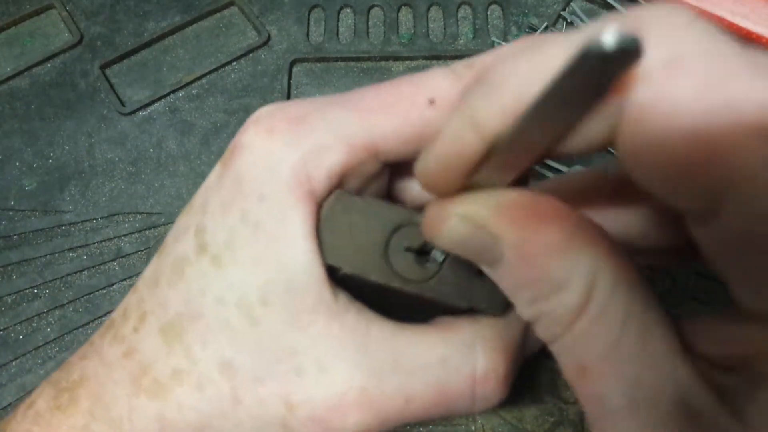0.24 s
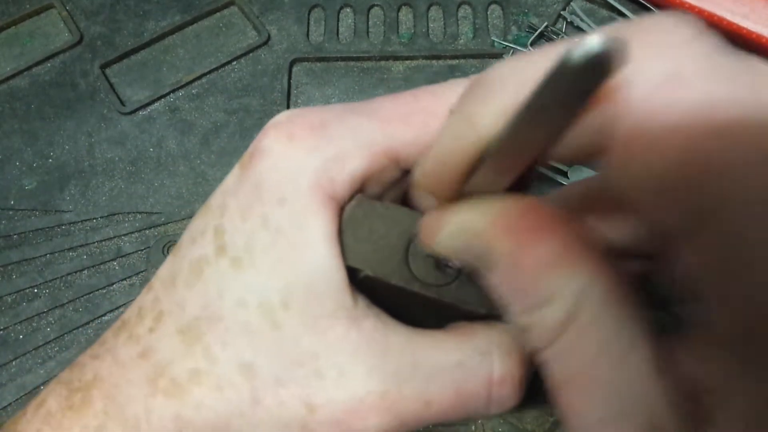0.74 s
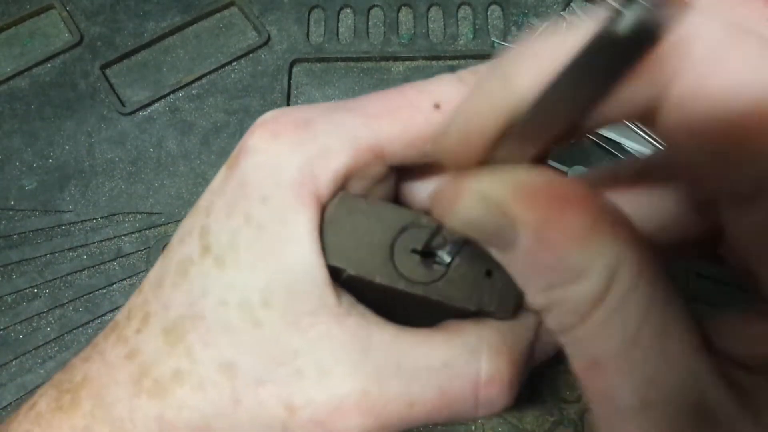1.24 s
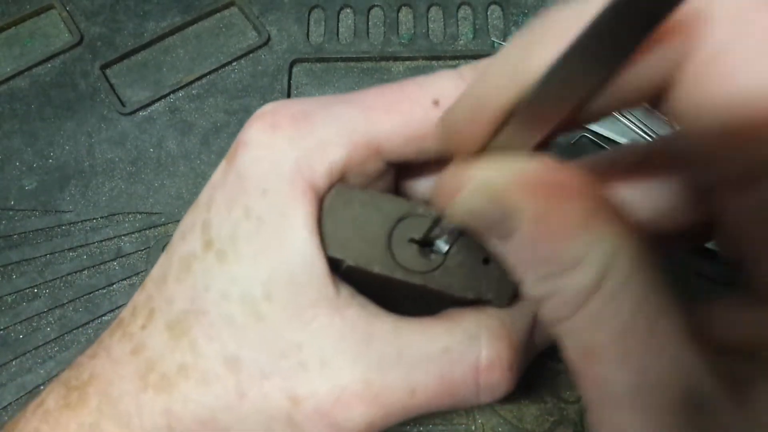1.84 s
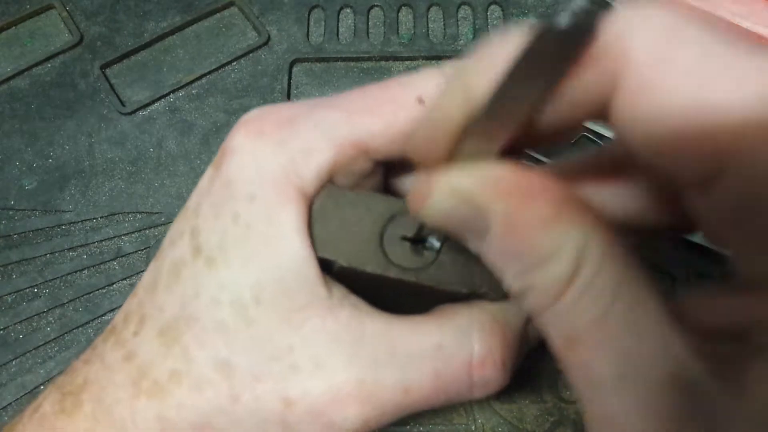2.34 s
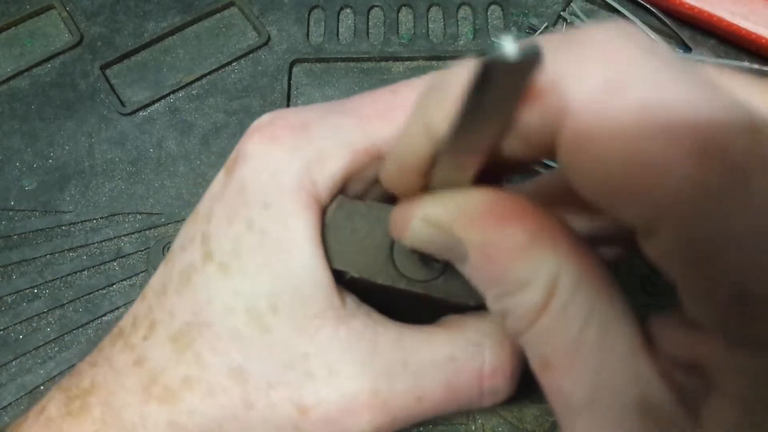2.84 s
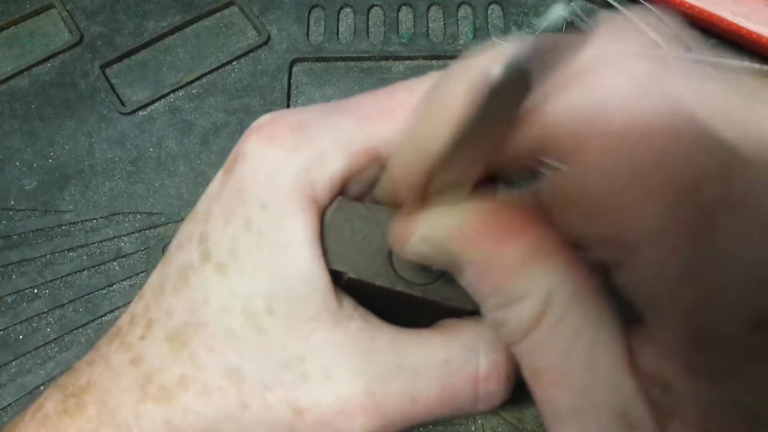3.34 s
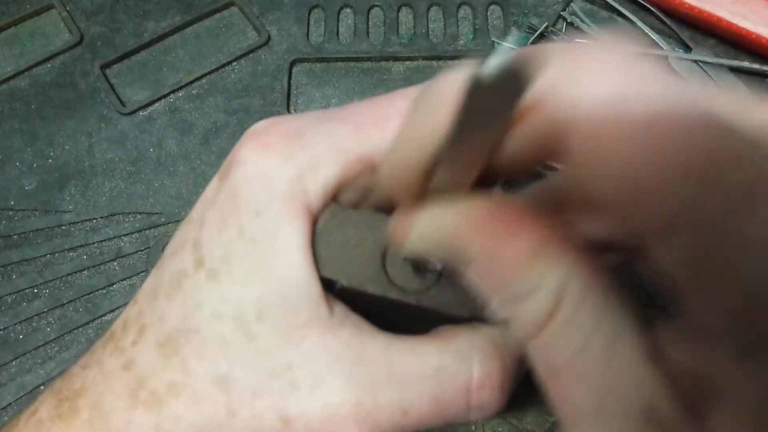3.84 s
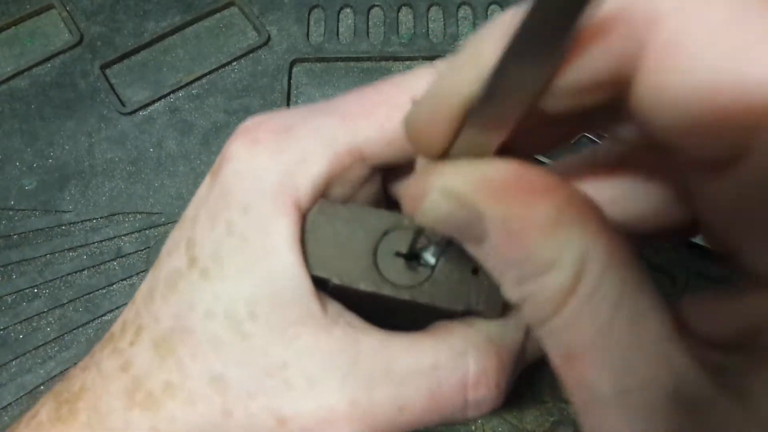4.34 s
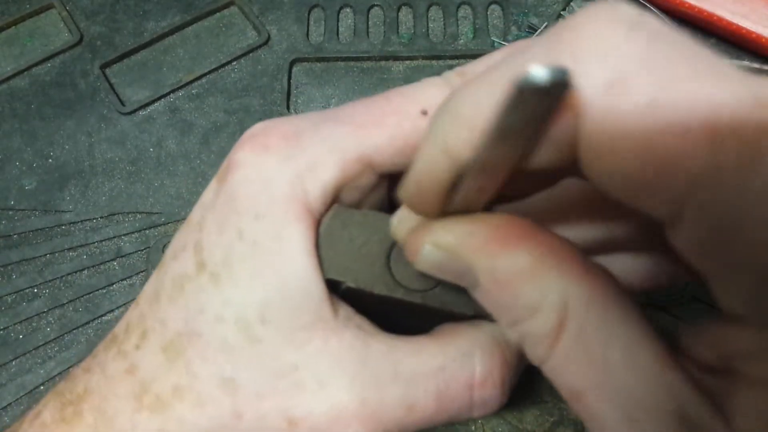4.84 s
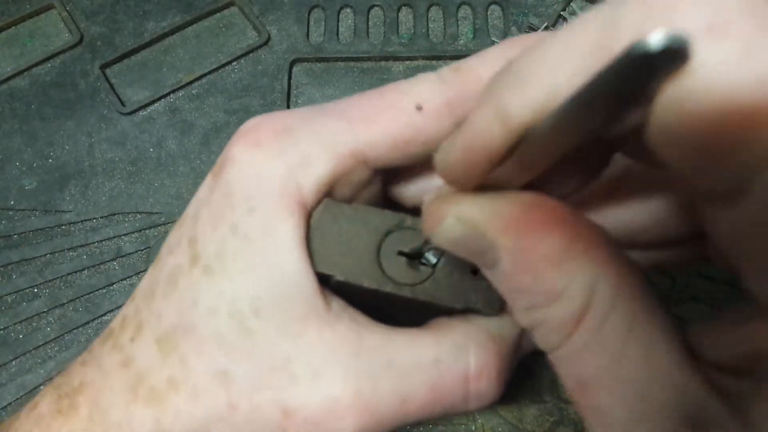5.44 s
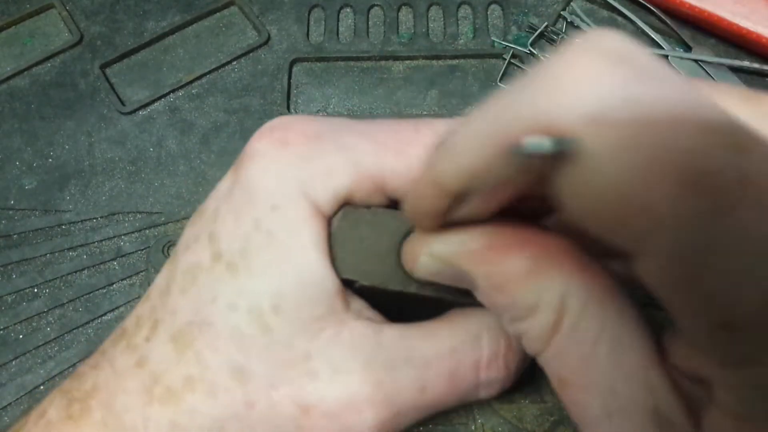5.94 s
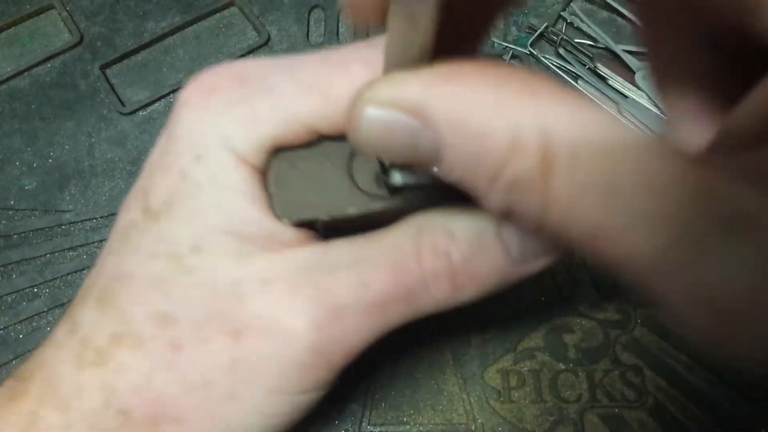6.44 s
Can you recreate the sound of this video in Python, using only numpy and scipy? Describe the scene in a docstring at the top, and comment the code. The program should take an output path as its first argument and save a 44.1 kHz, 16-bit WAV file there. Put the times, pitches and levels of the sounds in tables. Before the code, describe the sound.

Irregular light metal ticks come in twos and threes as a pick is pushed into and pulled out of a lock, crisp and high, with small hollow knocks, dull thumps of the hand and rubbing on a mat. They thin out slightly before a hard, bright snap with a short clunk and metallic ring near the end. Faint ticks follow. Close stereo microphone, brighter on the right, small room with low steady hush.

```python
"""A padlock held over a rubber mat in a small room, close to and right of a stereo microphone; room tone throughout.
From the start the pick is pushed in and pulled back in quick bursts: steel contacts are shaped bursts of filtered
grit. Bumps of the hand ring the bench modes softly, while skin and mat rustle as swelling filtered noise.
At about 6.1 s the shackle springs free: hard blows excite two ringing groups of modes, the body clunks and
the bench is jolted. A few small pin snaps and a last faint pull follow, over the dying reverberation."""
import sys
import numpy as np
from scipy import signal
from scipy.fft import rfft, irfft
from scipy.io import wavfile
from scipy.ndimage import uniform_filter1d

SR = 44100
rng = np.random.default_rng(int(sys.argv[2]) if len(sys.argv) > 2 else 0)


def master_out(mix):
    """Clip the mix to full scale and print it as 16-bit PCM to the path in sys.argv[1]."""
    frames = np.transpose(np.atleast_2d(mix))
    ceiling = np.clip(frames, -1, 1)
    pcm = np.round(ceiling * 32767).astype(np.int16)
    wavfile.write(sys.argv[1], SR, pcm)


N = 294588
TIME = np.arange(N) / SR

# Table levels are taken ahead of the layer gains and the room. Spectra give shape only; coloured() keeps the power.
# Contact length is the rise plus the fall time constant of the contact's power.

# Room tone spectrum: (frequency [Hz], relative density [dB])
ROOM_TONE_SPECTRUM = [(12, -14), (20, -38), (38, 2.5), (107, -0.5), (241, -7), (293, -5.5), (590, -16.5),
                      (825, -17), (1400, -18.5), (1960, -20), (3630, -18.5), (6720, -10), (9400, -22.5),
                      (14700, -21.5), (16000, -20)]
# Room reverberation: (frequency [Hz], level re direct [dB], t60 [s])
ROOM_DECAY = [(148, -4, 0.66), (400, -8, 0.38), (980, -9.5, 0.32), (2120, -9.5, 0.27), (3560, -7, 0.27),
              (4900, -7, 0.34), (6900, -9.5, 0.33), (10400, -8, 0.21), (15100, -19, 0.42)]
# Left microphone, shaded from the lock: (frequency [Hz], left re right [dB])
LEFT_SHADE = [(100, -1.5), (500, -3.5), (2000, -4.5), (4500, -4.5), (7000, -5.5), (9000, -9.5),
              (12000, -13), (16000, -17.5)]
# Fingers shifting on the lock, points of a level curve: (time [s], level [dB])
GRIP_LEVELS = [(0, -62.5), (0.8, -59.5), (1.3, -58), (2.0, -52.5), (2.7, -60.5), (3.6, -59), (4.2, -56),
               (4.6, -75), (5.1, -61), (5.6, -58.5), (6.68, -78)]
# Skin on the lock: (frequency [Hz], relative density [dB])
SKIN_SPECTRUM = [(30, -11.5), (80, 4.5), (170, -1.5), (330, -5.5), (600, -14.5), (1200, -17.5), (4000, -41)]
# Hands sliding on the mat: (time of peak [s], level [dB], half length [s])
MAT_RUBS = [(0.174, -47, 0.076), (0.992, -49.5, 0.051), (1.524, -47.5, 0.085), (1.984, -51.5, 0.11),
            (2.112, -50, 0.056), (2.37, -56, 0.099), (2.597, -55, .059), (3.511, -49.5, 0.076),
            (3.834, -46.5, 0.056), (4.27, -48.5, 0.072), (4.7, -55.5, 0.11), (5.707, -48, 0.068)]
# Hands on the mat: (frequency [Hz], relative density [dB])
RUB_SPECTRUM = [(50, -7), (120, -12.5), (250, -2), (370, -5), (520, -13), (750, -11.5), (1200, -23),
                (4000, -38)]
# Modes of the bench: (frequency [Hz], relative level [dB], t60 [s])
BENCH_MODES = [(99.4, 4, 0.13), (152.9, -2, 0.33), (168.8, 0.5, 0.15), (207, 2, 0.18), (233, -14.5, 0.75),
               (293, -2.5, 0.26), (316, 3.5, 0.069), (356, 4.5, 0.15), (390, -13, 0.28), (445, -5, 0.23),
               (520, -15, 0.11), (623, -8, 0.07)]
# Jolts of the bench as the lock opens: (time [s], level [dB])
OPENING_JOLTS = [(6.1590, -29.5), (6.1795, -35)]
# Lock body clunking in the hand, one row: (time [s], level [dB], frequency [Hz], t60 [s])
BODY_CLUNK = (6.1583, -9, 320, .012)
# Shackle and latch blows at the opening: (time [s], level [dB], contact length [ms])
SHACKLE_BLOWS = [(6.1432, -23, 3), (6.1571, -11, 5.3), (6.1650, -22.5, 2.3), (6.171, -21, 1.9),
                 (6.1768, -4, 1.67), (6.19, -25, 16)]
# Blows of the shackle: (frequency [Hz], relative density [dB])
SHACKLE_SPECTRUM = [(80, -65), (500, -13), (800, -15), (1400, -19), (2400, -15), (3600, -15.5),
                    (4700, -10.5), (5200, -6), (6000, -8), (6300, -8), (7000, -13.5), (9400, -16),
                    (10000, -4), (10200, -8), (10600, 6.5), (11200, -13), (12500, -15), (16000, -33)]
# Groups of shackle modes that ring on: (centre [Hz], spread [Hz], level [dB], t60 [s])
SHACKLE_MODE_GROUPS = [(5400, 550, -14.5, 0.26), (11060, 320.3, -23, 0.19)]
# Hollow knock of the lock body: (frequency [Hz], relative density [dB])
KNOCK_SPECTRUM = [(50, -35.5), (130, 3.5), (300, 0), (520, -6), (900, 0), (1350, -6.5), (2000, -0.5),
                  (2600, -3.5), (3300, -1.5), (4200, -2), (5500, -20.5)]
# Ring of the steel pick: (frequency [Hz], relative density [dB])
RING_SPECTRUM = [(2800, -19.5), (4000, -6), (5000, -6), (6000, -0.5), (6750, 3), (7400, -1), (8400, -1.5),
                 (10500, -38)]
# Bright scraping edge: (frequency [Hz], relative density [dB])
EDGE_SPECTRUM = [(6500, -15.5), (8800, 0.5), (11000, 1.5), (13000, 2.5), (15200, 3), (17000, -36)]
# Pick pushed in over the pins to the back of the keyway:
# (time [s], stroke length [ms], level [dB], knock at the stop [dB], hand bump [dB])
PUSHES = [(0.0431, 27.3, -24, -25.5, -47), (0.4203, 5.8, -29.5, -25, -58), (0.673, 8.9, -28.5, -32.5, -52),
          (1.1633, 8.55, -28.5, -24, -60), (1.403, 31.4, -22, -24, -41), (1.6917, 46.5, -23.5, -25.5, -51),
          (1.9509, 27.7, -20.5, -24, -45.5), (2.24, 48, -22.5, -23, -63), (2.5338, 21.3, -22.5, -23, -55),
          (3.3942, 21, -25, -34, -47), (3.7497, 16.6, -23.5, -37, -40), (4.1461, 14.7, -21.5, -27.5, -60),
          (4.5758, 13.2, -22.5, -26, -54), (5.5993, 13, -21, -35.5, -48)]
# Pick pulled back, pins ticking off its ridges:
# (time [s], stroke length [ms], level [dB], swell first to last pin [dB], knock [dB], knock centre [Hz],
#  hand bump [dB])
PULLS = [(0.2176, 16.3, -27.5, 4, -39.5, 900, -50), (0.8775, 9, -33, -1, -33, 2420, -58),
         (1.2629, 33, -24.5, -0.5, -33, 800, -46), (1.5371, 8.3, -25.5, -5, -35, 1392, -66),
         (1.5694, 4.2, -21.5, -4, -34, 1080, -63), (1.8089, 7.6, -24.5, 0, -33, 2320, -48.5),
         (1.8328, 19.4, -23.5, 2, -37, 2540, -68), (2.0826, 44.7, -23.5, 0, -33.5, 2900, -44),
         (2.385, 8.7, -21.5, -0.5, -33, 801, -46.5), (2.4232, 8.02, -22, -2, -31, 690, -59),
         (2.6575, 7.2, -24.5, 2, -34.5, 1000, -51), (3.192, 5.4, -27.5, -3.5, -36, 730, -55.5),
         (3.5593, 6.9, -23.5, -3, -34, 960, -51), (3.9452, 5.4, -25, -2, -36, 740, -53),
         (4.3317, 8.7, -23.5, 3.5, -38, 800, -47), (5.735, 13, -29.5, -1, -41, 900, -53),
         (6.519, 71, -43, -3, -59, 3030, -75)]
# Single pins snapping down between strokes:
# (time [s], level [dB], contact length [ms], knock [dB], knock frequency [Hz])
PIN_SNAPS = [(0.17, -23, 1.03, -31, 1000), (0.5107, -28.5, 1.11, -32, 1140), (0.822, -41, 2.7, -41, 1100),
             (0.8298, -24, 1.25, -38, 1000), (0.9168, -32, 1.4, -38.5, 1700), (0.97, -39.5, 3, -40.5, 1091),
             (1.0135, -22, 2.53, -31, 3300), (1.142, -28, 2.7, -37, 1085),
             (1.509, -24.5, 0.91, -31.5, 1100), (2.6894, -28, 1.75, -35.5, 640),
             (2.816, -27, 1.84, -37, 3257), (2.9354, -39, 1.7, -41.5, 2950), (2.9488, -38, 0.79, -39, 1010),
             (3.448, -29, 2, -44.5, 995), (3.5188, -39, 1.6, -37.5, 707), (3.7265, -43, 0.72, -37.5, 3090),
             (3.8684, -18.5, 0.79, -24, 2650), (3.8855, -39, 5.3, -43, 795), (3.919, -37, 2.2, -38.5, 2110),
             (4.072, -42, 1.06, -42.5, 790), (4.3563, -27, 1.07, -34, 690.7),
             (4.3915, -23.5, 2.35, -35.5, 980), (4.7729, -33, 2.12, -45, 960),
             (4.879, -49.5, 3.4, -60, 2800), (4.9299, -44, 1.1, -41, 1784),
             (5.0462, -49.5, 1.1, -46.5, 2015), (5.217, -43.5, 1.5, -53, 1400),
             (5.248, -30.5, 0.97, -38.5, 750.3), (5.269, -26, 1.78, -43, 3297),
             (5.3826, -30, 1.5, -38, 850), (5.419, -24, 1.3, -35.5, 2500), (5.929, -35, 0.98, -43.5, 905.5),
             (5.9519, -28, 0.93, -29, 1920), (6.023, -24, 1.08, -28, 952), (6.064, -47, 4, -48, 1010),
             (6.112, -46.5, 4.5, -52.5, 900), (6.1395, -18.5, 1.83, -33.5, 2980),
             (6.329, -41.5, 1.5, -43.5, 1670), (6.376, -47, 2.4, -46.5, 2644),
             (6.6158, -33, 0.76, -50, 3344)]

# place and microphone
ROOM_TONE_DB = -58  # before the side balance
LEFT_LAG_S = 0.00011
PEAK_LIMIT, CUTOFF_HZ = 0.72, 15700  # limit re full scale
SHACKLE_LEFT_DB, ROOM_RIGHT_DB = 2.5, -1.5  # each re the other side

# push: contact lengths of a touch or tick, the grating and the stop
TICK_MS, GRATE_MS, STOP_MS = 1.71, 4.45, 1.15
FIRST_TOUCH_DB, GRATE_KNOCK_DB = -4.5, -11.5  # re the level of the push
STOP_RING_DB = 1.5  # re the knock at the stop
GRATE_AT_SHARE, PUSH_BUMP_SHARE = 0.42, 0.45  # shares of the push: hardest grating, hand bump
GRATE_KNOCK_HZ, STOP_KNOCK_HZ = 3130, 1900

# pull: no two pins are met alike; spreads are standard deviations
PIN_GAP_MS, PIN_JITTER_MS, PIN_SPREAD_DB = 11.0, 2, 1.0
KNOCK_SPREAD_OCTAVES = 0.35

# all pick contacts
PUSH_EDGE_DB, PULL_EDGE_DB, SNAP_EDGE_DB = -2.5, -0.5, -0.8  # re the contact level, before the layer gains
RASP_DB, RASP_SHARE = -17.5, 0.16  # shaft: level and knock re the stroke's; contact length re stroke length
PICK_RING_HZ, RING_SPREAD_OCTAVES = 6720, 0.1
SNAP_BUMP_DB = -22.5  # nudge of the mat re the snap's knock


def from_db(db):
    """Turn decibels into an amplitude factor."""
    return 10 ** (np.asarray(db) / 20)


def at_hz(points, hz, axis=1):
    """Read a column of a spectrum on a log-frequency axis."""
    points = np.array(points)
    return np.interp(np.log(np.maximum(hz, 1)), np.log(points[:, 0]), points[:, axis])


def convolve(x, response):
    """Pass each side through its response, cut to the scene's length."""
    return signal.fftconvolve(np.atleast_2d(x), np.atleast_2d(response), axes=-1)[:, :N]


def response_of(spectrum, size=4096):
    """Causal, minimum-phase impulse response: fold the cepstrum of the spectrum into positive time."""
    hz = np.arange(size // 2 + 1) * SR / size
    cepstrum = irfft(np.log(from_db(at_hz(spectrum, hz))))
    cepstrum[1:size // 2] *= 2
    cepstrum[size // 2 + 1:] = 0
    return irfft(np.exp(rfft(cepstrum)))


def coloured(x, spectrum):
    """Give white sound a spectrum and keep its power."""
    response = response_of(spectrum)
    return convolve(x, response / np.sqrt(np.sum(response ** 2)))


def stereo_noise(alike):
    """White noise whose sides share the given part of their power."""
    return np.sqrt(alike) * rng.standard_normal(N) + np.sqrt(1 - alike) * rng.standard_normal((2, N))


def grit(alike, spread_db, size=160):
    """Steel on steel: a stream of tiny impacts of uneven size, its power evened over `size` samples."""
    impacts = stereo_noise(alike) * from_db(spread_db * rng.standard_normal(N))
    return impacts / np.sqrt(uniform_filter1d(impacts ** 2, size, axis=-1) + 1e-9)


def contact_shape(s, ms, rise_share):
    """Force of one short contact builds up, peaks at its time and dies away: (samples, force)."""
    near = slice(max(0, int((s - 0.02) * SR)), int((s + 0.04) * SR))
    age = (TIME[near] - s) * 1000 / ms  # in contact lengths
    side_share = np.where(age < 0, rise_share, 1 - rise_share)
    return near, np.exp(-abs(age) / side_share / 2)


def contacts(scrape, times, levels_db, lengths_ms, rise_share, pitches_hz=None, q=3.0, plain_db=-6.0):
    """Short bursts of scraping, each through a resonance of its own if pitches are given."""
    out = np.zeros((2, N))
    for k, s in enumerate(times):
        near, force = contact_shape(s, lengths_ms[k], rise_share)
        # shift the grit so that neighbouring contacts differ
        burst = np.roll(scrape[:, near], k * 97, axis=-1) * force
        if pitches_hz is not None:
            resonant = signal.lfilter(*signal.iirpeak(pitches_hz[k], q, fs=SR), burst)
            burst = from_db(plain_db) * burst + resonant
        same_power = np.sqrt(np.mean(force ** 2) / np.mean(burst ** 2))
        out[:, near] += from_db(levels_db[k]) * burst * same_power
    return out


def room_tone():
    """Steady coloured noise, partly alike at both sides and a little stronger on the right."""
    air = coloured(stereo_noise(0.33), ROOM_TONE_SPECTRUM)
    return from_db(ROOM_TONE_DB) * air * from_db([[-1.0], [1.0]])


def room(x, build_s=0.0037, count=14):
    """Diffuse reverberation that builds up, then dies band by band; the sides are alike only in the bass."""
    t, tail = TIME[:SR * 3 // 4], 0
    hz = np.arange(len(t) // 2 + 1) * SR / len(t)
    white = rfft(rng.standard_normal((3, len(t))))
    alike = 1 / (1 + (hz / 200) ** 2)
    white = np.sqrt(alike) * white[2] + np.sqrt(1 - alike) * white[:2]
    centres = np.geomspace(100, 16000, count)
    for centre, share in zip(centres, np.eye(count)):
        # overlapping triangular bands
        band = irfft(white * np.interp(hz, centres, share), len(t))
        build = 1 - np.exp(-(t / build_s) ** 2)
        decay = from_db(-60 * t / at_hz(ROOM_DECAY, centre, axis=2)) * build
        tail = tail + band * from_db(at_hz(ROOM_DECAY, centre)) * decay / np.sqrt(np.sum(decay ** 2))
    return convolve(x, tail) * from_db([[0], [ROOM_RIGHT_DB]])


def fingers():
    """Friction as dull noise: skin rustles on the lock, and hands slide on the mat in soft swells."""
    s, level_db = np.transpose(GRIP_LEVELS)
    grip = from_db(np.interp(TIME, s, level_db)) * coloured(stereo_noise(1.0), SKIN_SPECTRUM)
    slide = sum(from_db(peak_db) * np.exp(-((TIME - at) / half_s) ** 2) for at, peak_db, half_s in MAT_RUBS)
    return grip + slide * coloured(stereo_noise(1.0), RUB_SPECTRUM)


def strike_bench(blows, soft_hz):
    """Impulses set the decaying bench modes ringing; a low-pass softens the blows."""
    force, out = np.zeros(N), np.zeros(N)
    for s, level_db in blows:
        force[round(s * SR)] += from_db(level_db)
    for k, (hz, level_db, t60) in enumerate(BENCH_MODES):
        r = from_db(-60 / (t60 * SR))  # decay per sample
        w = 2 * np.pi * hz / SR
        gain = from_db(level_db) * (-1) ** k  # modes alternate in sign
        # the tiny offset keeps the filter clear of denormal numbers
        out += gain * signal.lfilter([0, np.sin(w)], [1, -2 * r * np.cos(w), r * r], force + 1e-18)
    return signal.sosfilt(signal.butter(4, soft_hz, fs=SR, output="sos"), out)


def hand_bumps():
    """Every stroke rocks the hand against the mat, and snapping pins nudge it: (time [s], level [dB])."""
    pushes = [(s + PUSH_BUMP_SHARE * ms / 1000, db) for s, ms, *_, db in PUSHES]
    pulls = [(s, db) for s, *_, db in PULLS]
    snaps = [(s, knock_db + SNAP_BUMP_DB) for s, _, _, knock_db, _ in PIN_SNAPS]
    return pushes + pulls + snaps


def clunk():
    """One heavy swing of the lock body, stopped at once by the palm: a fast-decaying sine."""
    s, level_db, hz, t60 = BODY_CLUNK
    age = np.clip(TIME - s, 0, 1)
    return -from_db(level_db - 60 * age / t60) * np.sin(2 * np.pi * hz * age)


def thuds():
    """Soft bumps while raking, a clunk and hard jolts at the opening; small things radiate little deep bass."""
    bumps = from_db(6.5) * strike_bench(hand_bumps(), soft_hz=132.4)
    jolts = strike_bench(OPENING_JOLTS, soft_hz=1500)
    return signal.sosfilt(signal.butter(4, 52, "high", fs=SR, output="sos"), bumps + jolts + clunk())


def shackle():
    """The freed shackle shoots out, chatters and hits its stop; two crowded groups of modes ring on."""
    blows = contacts(grit(0.5, 5.1), *np.transpose(SHACKLE_BLOWS), 0.18)
    t, rings = TIME[:SR // 2], 0
    hz = np.arange(len(t) // 2 + 1) * SR / len(t)
    for centre_hz, spread_hz, level_db, t60 in SHACKLE_MODE_GROUPS:
        strengths = np.exp(-((hz - centre_hz) / spread_hz) ** 2 / 2)
        phases = np.exp(2j * np.pi * rng.random((2, len(hz))))
        modes = irfft(strengths * phases, len(t)) * from_db(-60 * t / t60)
        rings = rings + from_db(level_db) * modes / np.sqrt(np.sum(modes ** 2) / 2)
    direct = from_db(0.5) * coloured(blows, SHACKLE_SPECTRUM)
    return from_db([[SHACKLE_LEFT_DB], [0]]) * (direct + convolve(blows, rings))


def push(s, length_ms, level_db, stop_db):
    """Tip touches the first pin, ridges grate over the rest, tip knocks on the back; the shaft rasps along."""
    length_s, knock_db = length_ms / 1000, level_db + GRATE_KNOCK_DB
    touch = (s, level_db + FIRST_TOUCH_DB, TICK_MS, knock_db, PUSH_EDGE_DB, GRATE_KNOCK_HZ)
    grate = (s + GRATE_AT_SHARE * length_s, level_db, GRATE_MS, knock_db, PUSH_EDGE_DB, GRATE_KNOCK_HZ)
    stop = (s + length_s, stop_db + STOP_RING_DB, STOP_MS, stop_db, PUSH_EDGE_DB, STOP_KNOCK_HZ)
    rasp = (s + length_s / 2, level_db + RASP_DB, RASP_SHARE * length_ms,
            knock_db + RASP_DB, PUSH_EDGE_DB, GRATE_KNOCK_HZ)
    return [touch, grate, stop, rasp]


def pull(s, length_ms, level_db, swell_db, knock_db, knock_hz):
    """A nearly even row of ticks that grows or fades along the stroke, over the rasp of the shaft."""
    pins = int(np.clip(round(length_ms / PIN_GAP_MS) + 1, 2, 32))
    late, strong, high = rng.standard_normal((3, pins))
    along = np.linspace(0, 1, pins)
    ms = along * length_ms
    ms[1:-1] += PIN_JITTER_MS * late[1:-1]  # first and last pin keep their time
    times = s + ms / 1000
    force_db = swell_db * (along - 0.5) + PIN_SPREAD_DB * strong
    pitches_hz = knock_hz * 2 ** (KNOCK_SPREAD_OCTAVES * high)
    ticks = [(at, level_db + db, TICK_MS, knock_db + db, PULL_EDGE_DB, hz)
             for at, db, hz in zip(times, force_db, pitches_hz)]
    rasp = (times.mean(), level_db + RASP_DB, RASP_SHARE * length_ms,
            knock_db + RASP_DB, PULL_EDGE_DB, knock_hz)
    return ticks + [rasp]


def pin_contacts():
    """Every pick touch and pin snap: (time [s], level [dB], length [ms], knock [dB], edge [dB], knock [Hz])."""
    rows = [touch for *stroke, bump_db in PUSHES for touch in push(*stroke)]
    rows += [touch for *stroke, bump_db in PULLS for touch in pull(*stroke)]
    return rows + [(s, db, ms, knock_db, SNAP_EDGE_DB, hz) for s, db, ms, knock_db, hz in PIN_SNAPS]


def raking():
    """Each contact gives a hollow knock in the lock body, a ring of the steel pick and a bright scraping edge."""
    s, level_db, ms, knock_db, edge_db, knock_hz = np.transpose(pin_contacts())
    # the ring's pitch changes a little from contact to contact
    ring_hz = PICK_RING_HZ * 2 ** (RING_SPREAD_OCTAVES * rng.standard_normal(len(s)))
    knock_grit = coloured(grit(0.68, 6.0), KNOCK_SPECTRUM)
    ring_grit = coloured(grit(0.16, 3.1), RING_SPECTRUM)
    edge_grit = coloured(grit(0.14, 12.0), EDGE_SPECTRUM)
    knock = contacts(knock_grit, s, knock_db, ms, 0.32, knock_hz, q=2.8, plain_db=-0.5)
    ring = contacts(ring_grit, s, level_db, ms, 0.32, ring_hz, q=1.9, plain_db=1.5)
    edge = contacts(edge_grit, s, level_db + edge_db, ms, 0.28)
    return from_db(4.5) * knock + from_db(2.5) * ring + from_db(3.0) * edge


def scene():
    """The lock lies to the right: its sound reaches the left microphone later and duller."""
    near = raking() + shackle() + thuds() + fingers()
    left, right = near + room(near)
    late_left = np.interp(TIME - LEFT_LAG_S, TIME, left)
    left = convolve(late_left, response_of(LEFT_SHADE))[0]
    return np.array([left, right]) + room_tone()


def record(dry):
    """The very highest peaks are rounded and the top is cut steeply."""
    rounded = dry / (1 + (dry / PEAK_LIMIT) ** 6) ** (1 / 6)
    return signal.sosfilt(signal.ellip(10, 0.2, 80, CUTOFF_HZ, fs=SR, output="sos"), rounded)


dry = scene()
out = record(dry)
master_out(out)
```